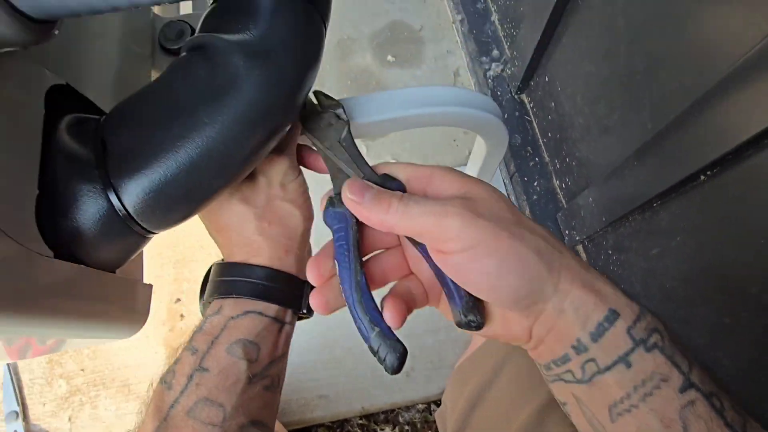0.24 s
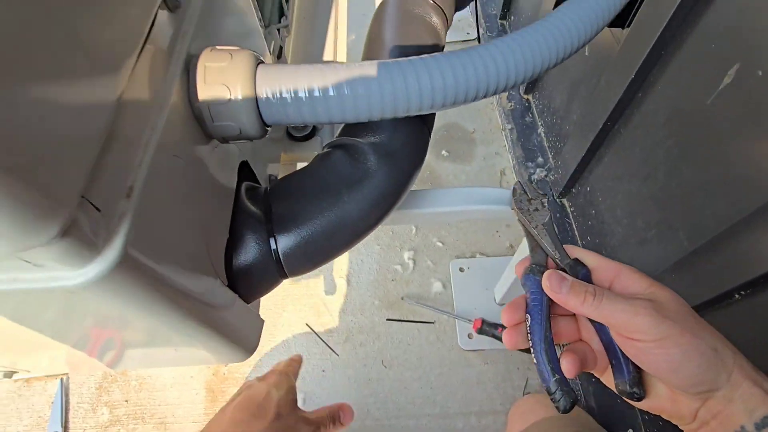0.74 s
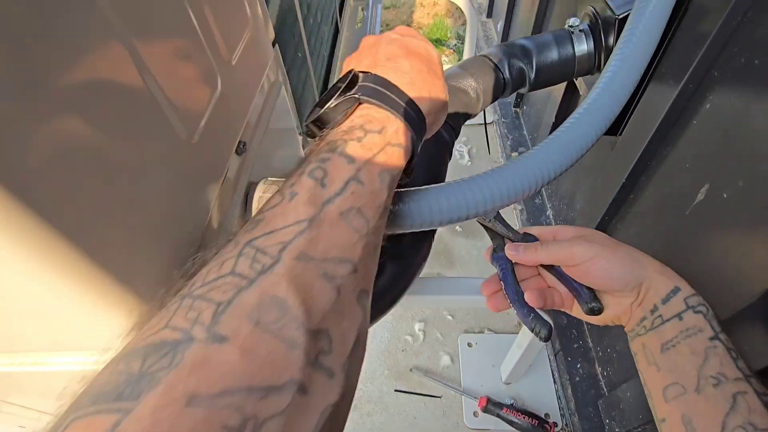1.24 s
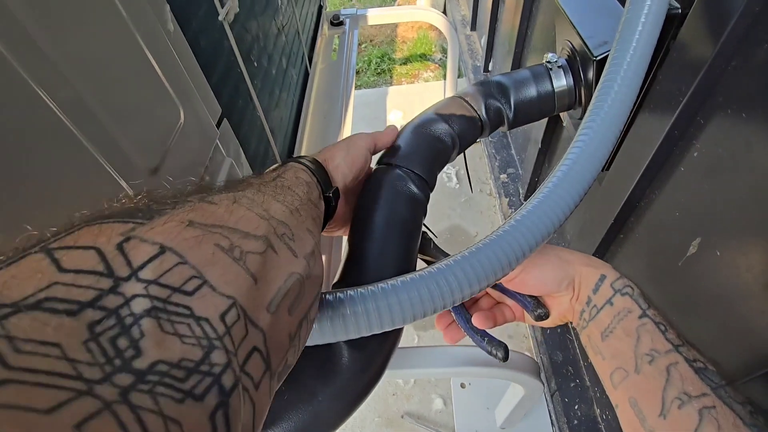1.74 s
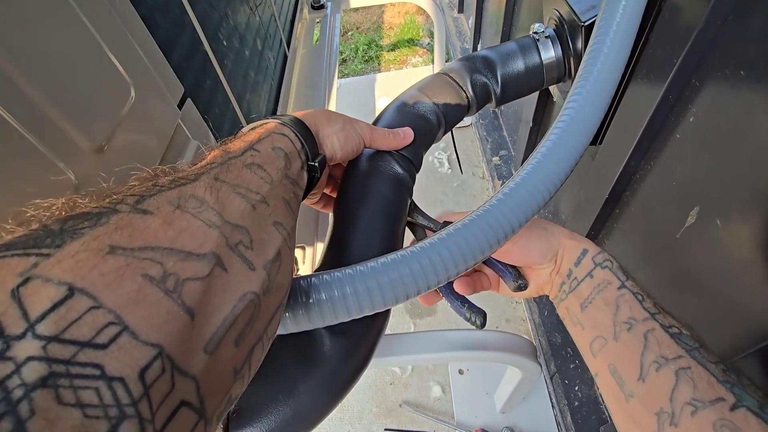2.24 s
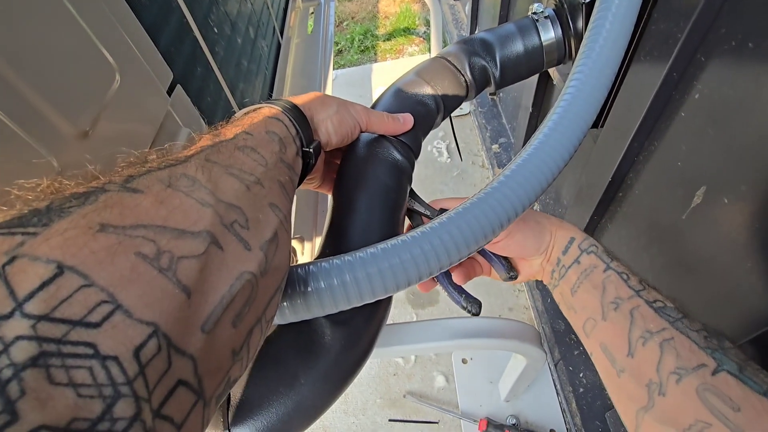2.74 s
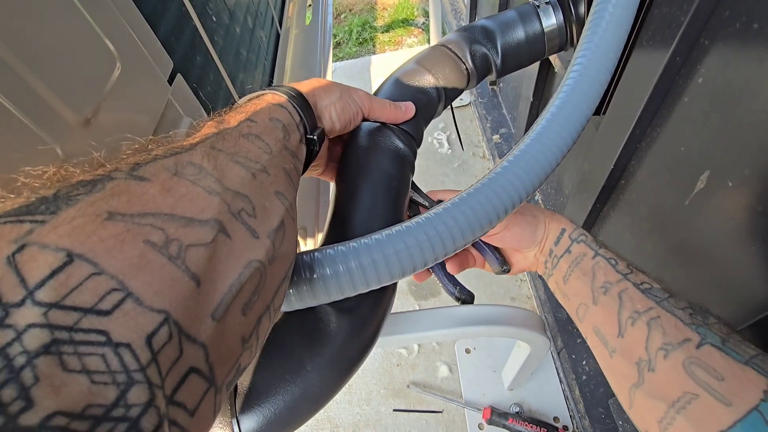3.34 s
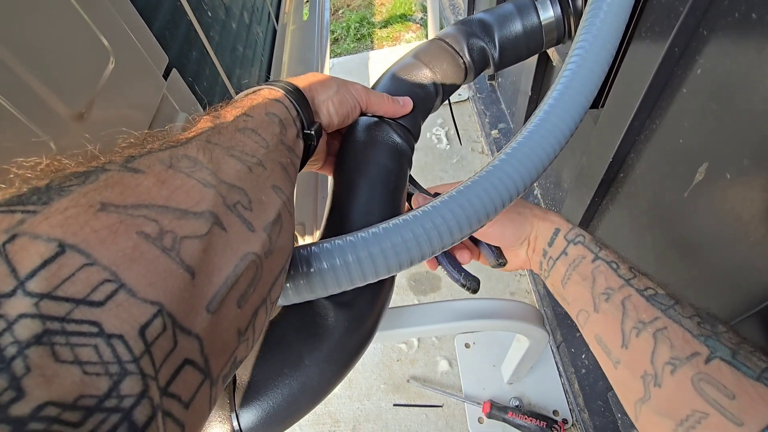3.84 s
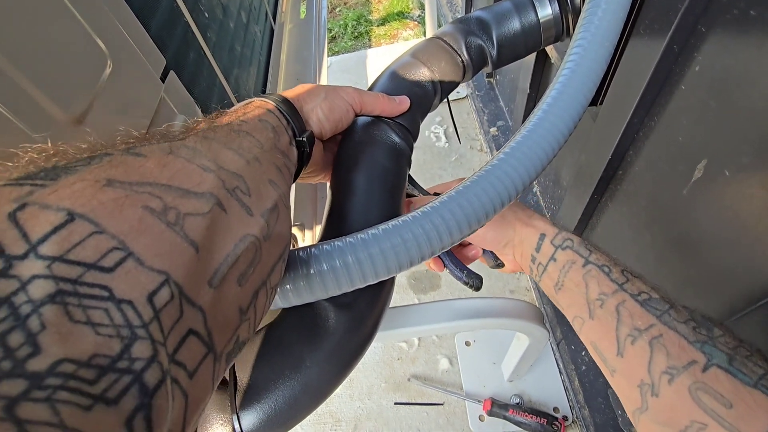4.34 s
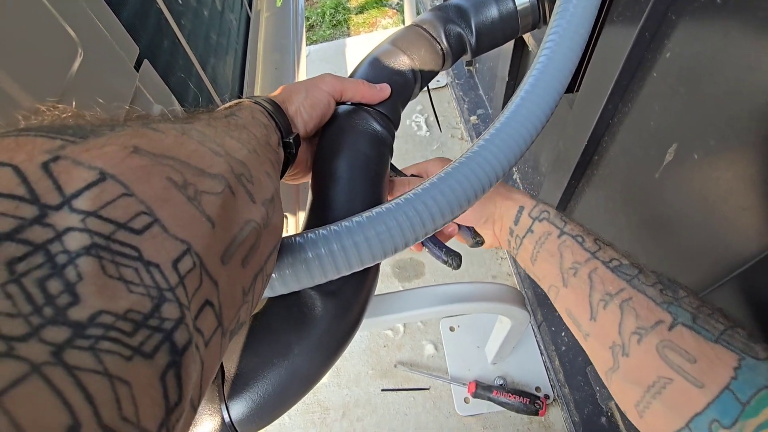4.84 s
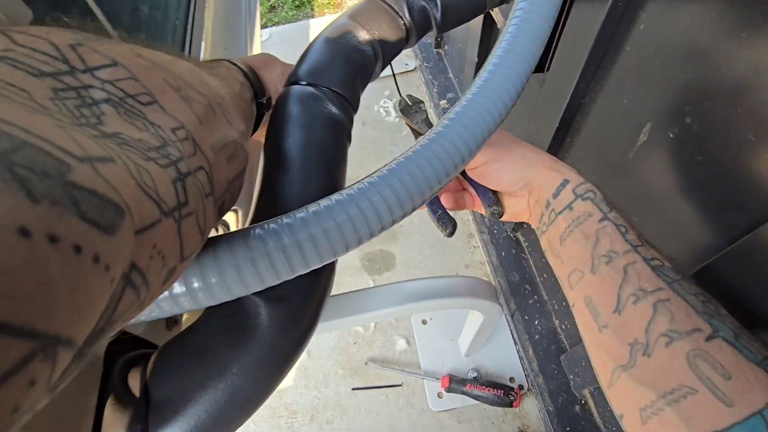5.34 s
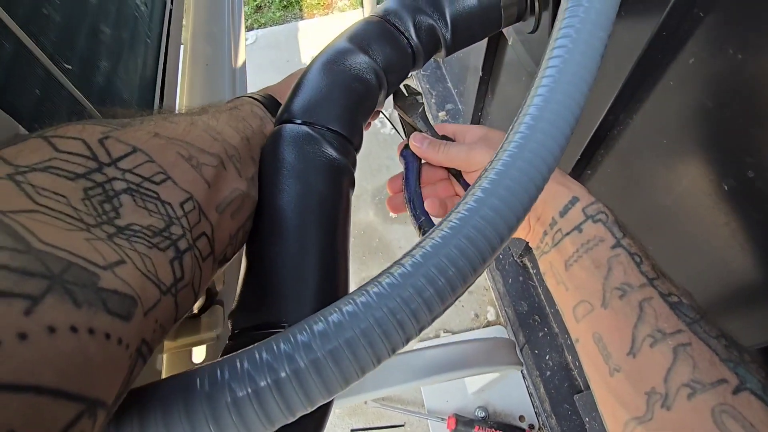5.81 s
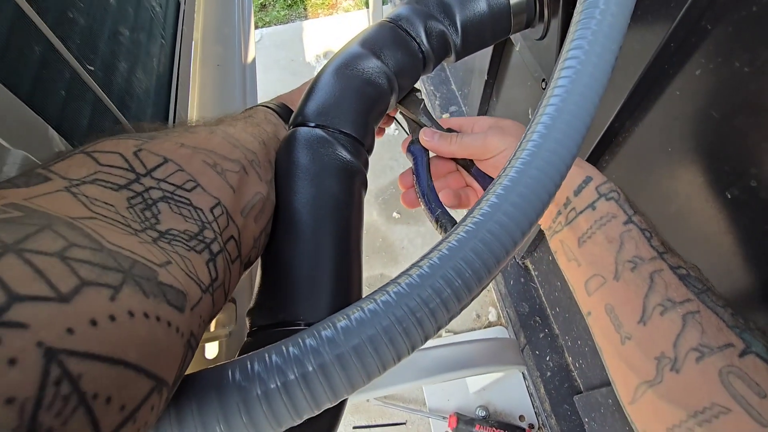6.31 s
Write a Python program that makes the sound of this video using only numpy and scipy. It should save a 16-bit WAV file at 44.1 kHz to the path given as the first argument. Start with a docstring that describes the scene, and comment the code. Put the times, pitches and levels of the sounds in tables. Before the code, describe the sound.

Cutters snip zip ties, with a few knocks on a metal cabinet and faint rubbing over a low outdoor rumble and distant birdsong.

```python
"""Diagonal cutters snip zip-tie tails on the hoses of an outdoor air conditioning unit.
Each sudden fracture rings the jaws and echoes between the metal cabinet and the wall. Offcuts tick,
the cabinet is knocked, and a bumped hose booms in its damped modes. Friction of arms on the lagging
makes a rustle and thin squeaks. Behind them lie a distant songbird, puffs of air on the two
microphones, a low rumble and the wash of the yard."""
import sys
import numpy as np
from scipy import signal
from scipy.io import wavfile
from scipy.ndimage import uniform_filter1d

SR = 44100
rng = np.random.default_rng(int(sys.argv[2]) if len(sys.argv) > 2 else 0)


def to_wav(sig):
    """Store sig (one row per channel, or 1-D mono) as 16-bit WAV at the path in sys.argv[1].

    Samples outside -1..1 are clipped; the rate is SR.
    """
    pcm = np.clip(np.atleast_2d(sig), -1, 1) * 32767
    pcm = np.round(pcm).astype(np.int16)
    wavfile.write(sys.argv[1], SR, pcm.T)  # frames by channels


N = 289737

# Impacts of the cutters, on the cabinet and of offcuts. Each row: start in seconds, relative level in dB,
# gains of the low, middle, high and top bands in dB, pan (left minus right) in dB.
CUTTER_SNIPS = [(0.1797, -42.5, -34, -42, 8.5, 5, 6), (0.1906, -18.5, -13.5, -14.5, -1.5, -1.5, 2.2),
                (0.4612, -30.5, -25, -13.5, -8.5, 1.5, 0.81), (5.1048, -18, -16, -8.5, -2.5, -6.5, 0.5)]
CABINET_KNOCKS = [(1.2812, -26, -8, -5, -1.5, -9.5, 2.75), (1.7112, -12.5, -10, -12, -8.5, -12, 1)]
OFFCUT_TICKS = [(0.573, -47, -11, -2, -5, -17.5, -4), (0.5858, -37, -3, 2, -11.5, -15, -0.5),
                (0.6235, -47, -20.5, -27, -10, 2, -2), (1.0225, -50, -21, -8, -11, 6, 0),
                (3.491, -50.5, -0.5, -5, -16, -36, 1), (3.71, -53.5, -19, -14, -6, -10, -2),
                (3.997, -48, -11, -5.5, -3, -7, 1), (4.469, -50.5, -2.5, -3, -13, -12, 2),
                (5.163, -43, -3, -2, -14, -30, 2.5), (5.3165, -43, 0, -1, -3, -28, 2),
                (5.757, -47, -4, -11.5, -19, -18, -11), (6.548, -59.5, -6.5, -9.5, -2, -23, -1)]
# Spectra of their noise bursts. Each row: frequency in Hz, gain in dB.
SNIP_SPECTRUM = [(150, -15), (330, -1), (420, -8), (560, -18.5), (800, -16), (1200, -20), (1500, -6),
                 (1750, -17.5), (2150, -5), (3000, -8), (4200, -5.5), (6000, -7.5), (8600, -10.5),
                 (10400, -17), (12400, -5), (16000, -16)]
KNOCK_SPECTRUM = [(70, -21), (125, 2.5), (200, -4.5), (350, 3), (500, -3), (700, -4.5), (800, -9),
                  (930, -24), (1350, -11), (1700, -13.5), (2000, -14), (2750, -11), (4060, -23),
                  (7200, -23), (10400, -28.5), (12800, -24.5), (16000, -29.5)]
TICK_SPECTRUM = [(150, -32), (450, 8), (950, -8), (1700, -6), (3000, -1), (6000, -2), (10000, -9),
                 (16000, -3)]
# The four bands of an impact. Each row: lower and upper edge in Hz, base crack t60 and echo t60
# (time to fall 60 dB) in seconds, relative echo level in dB, left-right correlation from 0 to 1.
IMPACT_BANDS = [(119.4, 775, 0.025, 0.35, -16.5, .55), (690, 1900, 0.024, 0.13, -15, 0.07),
                (2500, 8000, 0.02, 0.096, -18.5, .1), (8000, 18000, 0.02, 0.15, -26, 0.05)]
# Imbalance of the impacts at the microphones. Each row: frequency in Hz, pan in dB.
IMPACT_PAN = [(200, -1), (500, -2), (1200, 0.5), (2500, 1.5), (3800, -0.5), (4700, -2), (6300, -6.5),
              (8000, 0), (9000, 6), (10300, 7.5), (12000, -2.5), (14500, -5)]
# Normal modes of the struck bodies. Each row: frequency in Hz, relative level in dB, t60 in seconds.
JAW_MODES = [(1470, -7, .04), (2110, -1, .06), (2620, -1, .07), (3380, -3, .07), (3770, -1, .07),
             (4350, -3, .07), (5250, -6, .05), (6100, -4, .05), (7400, -6, .05), (8800, -7, .04),
             (12700, -8, .04)]
CABINET_MODES = [(126, 8, 0.094), (210.5, 3, 0.34), (377, -8, 0.25), (433, -3, 0.26), (590, -5, 0.12),
                 (730, -5, 0.14), (1093, -16, 0.24), (1670, -10.5, 0.054), (1700, -11.5, 0.086),
                 (2500, -12, .09), (3000, -17.5, 0.14), (4650, -18, .1), (7090, -15.5, 0.075),
                 (7560, -24.5, 0.083)]
HOSE_MODES = [(262.6, 4.5, .38), (236, 5.5, 0.12), (289.6, -2.5, 0.17), (344.5, -8.5, 0.15),
              (454, -7.5, 0.18), (557, -20.5, 0.37), (740, -16.5, 0.16), (833, -18, 0.092)]
# Bumps on the hose. Each row: start in seconds, gain in dB, factor on pitch and decay rate.
HOSE_BUMPS = [(2.928, -35.5, 1.14), (5.3179, -30.5, 1), (5.3293, -26.5, 1.05), (5.3428, -28.5, 1),
              (5.401, -34, 0.98)]

# Arm strokes on the lagging. Each row: start and length in seconds, rustle, fizz and pan in dB.
ARM_STROKES = [(0.129, 0.52, -57, -59, 0.5), (0.593, 0.8, -64, -66, 0), (1.323, 0.87, -60, -62, 1),
               (2.136, 0.95, -66, -67.5, -0.5), (3.0, 0.78, -72.5, -95, -6), (4.007, 0.993, -72.5, -79, -1),
               (5.194, 0.42, -62, -62, 2), (5.5, 0.98, -66, -69, 2.5)]
# Soft scuffs of handling, and one low buffet of air on the microphones.
# Each row: start and length in seconds, centre and bandwidth in Hz, level in dB.
SCUFFS_AND_BUFFET = [(0.83, 0.14, 2400, 600, -57), (1.37, 0.1, 11400, 8000, -53),
                     (3.315, 0.168, 3770, 1100, -59.5), (4.457, 0.07, 1430, 1490, -52),
                     (5.309, 0.057, 1400, 1100, -47.5), (5.848, 0.75, 4960, 1780, -62.5),
                     (6.221, 0.1, 47.6, 36, -43.5)]
# Arches of squeak pitch. Each row: crest, rise and fall times in seconds, crest frequency in Hz,
# limiting slope of the flanks in Hz per second, relative level in dB.
SQUEAK_ARCHES = [(1.93, 0.13, 0.16, 14600, 20000, -66), (3.04, .005, .09, 15800, 52000, -75),
                 (3.249, 0.14, 0.11, 14500, 21000, -74.5), (4.14, .07, .09, 15150, 16000, -74),
                 (4.2, 0.21, 0.11, 12950, 17000, -70), (4.32, 0.058, 0.11, 12100, 17000, -71),
                 (4.32, .07, .1, 15100, 19000, -74), (4.51, .08, .1, 11000, 8000, -75),
                 (5.93, .15, 0.076, 15600, 24000, -68), (6.0, 0.19, 0.088, 13900, 7000, -70),
                 (6.09, 0.035, 0.14, 12300, 8500, -59.5), (6.22, .01, 0.075, 11500, 17000, -75),
                 (6.22, .02, .31, 15800, 17000, -71), (6.25, .05, .24, 14100, 15000, -71)]

# Bird syllables. Each row: time in seconds, frequency in Hz, relative level in dB, roughness from 0 to 1.
BIRD_PIP = [(0, 4380, -12, 0), (.010, 4190, 0, 0.05), (.021, 4115, 0, 0), (.031, 3950, -20, 0)]
BIRD_SLUR = [(0, 5920, -15, 0.986), (.012, 6270, -6, 0.33), (.025, 6050, -6, 0.53), (.033, 5300, 1, .1),
             (.042, 4160, -5, 0)]
BIRD_RISE = [(0, 5380, -20.5, 0.47), (.017, 6470, 4, 0.64), (.035, 7400, -10, .3), (.048, 8200, -23, 0.085)]
BIRD_WHISTLE = [(0, 3920, -20, .1), (.028, 3895, -5, .08), (.05, 3860, -5, .08), (.075, 3785, 0, .03),
                (.145, 3775, -1.5, .03), (.175, 3760, -15, .03)]
# Closing calls of the song. Each row: starts of the rise and of the whistle in seconds, gain in dB.
BIRD_CALLS = [(3.527, 3.566, -53.5), (3.86, 3.88, -51.5)]
# Distant chirps. Each row: start and length in seconds, first and last pitch in Hz, relative level in dB.
FAR_CHIRPS = [(0.67, .05, 4200, 3800, -77.5), (0.72, 0.082, 2125, 2040, -64),
              (0.82, .045, 3697, 3750, -67.5), (0.885, .05, 4430, 3780, -68),
              (1.2, 0.086, 4440, 3900, -72.5)]

# Puffs of air on the microphones. Each row: start and length in seconds, peak level and pan in dB.
AIR_PUFFS = [(2.27, 0.3, -53, -26), (2.427, .42, -45.5, -29.5), (2.68, 0.5, -45.5, -28.5),
             (3.052, 0.38, -59, -23), (4.897, 0.48, -54, -15)]
# Spectra of the continuous noises. Each row: frequency in Hz, relative level in dB.
RUSTLE_SPECTRUM = [(1350, -23.5), (2300, -1.5), (2550, -2), (3150, 0), (3780, -1), (5290, -2.5),
                   (6500, -1.5), (8120, -23), (9000, -21.5), (11700, -37.5), (19800, -120)]
FIZZ_SPECTRUM = [(4410, -36), (7500, 1), (8360, -4), (10600, -5), (11700, 2), (15100, 0.5), (15700, -3.5),
                 (16200, -11.5), (16500, -44)]
GUST_SPECTRUM = [(14, -30), (28, -10), (52, 4.5), (95, 1), (165, -1.5), (260, -10), (400, -17.5),
                 (800, -28.5), (1600, -49), (4000, -62.5)]
RUMBLE_SPECTRUM = [(14, -37), (22, -32.5), (30, -21.5), (38, -3.5), (50, 3.5), (65, 2), (91, 2.5),
                   (135, -1.5), (203, 2), (262, -3), (300, -14), (420, -23), (550, -49.5), (900, -100)]
YARD_SPECTRUM = [(190, -34), (330, -3), (405, -12.5), (472, -8), (590, -8), (710, -5), (850, -11),
                 (957, -17), (1320, -10), (1470, -13), (1650, -13.5), (2800, -28), (3640, -50.5),
                 (6160, -120)]
# Slow drift of the rumble's upper part and of the yard. Each row: time in seconds, gain in dB.
DRONE_DRIFT = [(0, -44), (1.6, -43.5), (3.75, -43), (4.6, -48.5), (6.57, -50.5)]
YARD_DRIFT = [(0, -53), (1.0, -55.5), (1.6, -49), (2.2, -52.5), (3.4, -53.5), (4.25, -59.5), (5.0, -62.5),
              (6.1, -57.5), (6.57, -62.5)]
# Likeness of the noises at the two microphones. Each row: frequency in Hz, correlation from -1 to 1.
NOISE_CORRELATION = [(60, .68), (130, .8), (290, .85), (640, .25), (1400, -.1), (3100, 0), (15000, -.1)]
# Imbalance of the noises at the microphones. Each row: frequency in Hz, pan in dB.
NOISE_PAN = [(60, -0.5), (110, 0), (200, -2.5), (380, -1.5), (700, -0.5), (1290, 3), (2380, -0.5),
             (4400, -4.5), (8120, -0.5), (15000, -6)]


def snips():
    """Fracture: a tie parts in a burst of noise that excites the modes of the jaws."""
    return impacts(CUTTER_SNIPS, SNIP_SPECTRUM, JAW_MODES,
                   level_db=-2.3, crack_scale=0.71, echo_db=-2, ring_db=-21.5)


def knocks():
    """Impulse response: the knocked metal cabinet rings in its normal modes."""
    return impacts(CABINET_KNOCKS, KNOCK_SPECTRUM, CABINET_MODES,
                   level_db=0, crack_scale=0.85, echo_db=5.5, ring_db=-5)


def ticks():
    """Light impact: offcuts click and only weakly excite the cabinet's modes."""
    return impacts(OFFCUT_TICKS, TICK_SPECTRUM, CABINET_MODES,
                   level_db=-3, crack_scale=0.61, echo_db=-5, ring_db=-25)


def impacts(rows, spectrum, modes, level_db, crack_scale, echo_db, ring_db, rise_s=0.0003):
    """Exponential decay: each crack, its ringing and its dense echoes die away band by band."""
    t = np.arange(SR // 2) / SR
    ringing = gain_of(ring_db) * unit_rms(ring(modes, t))
    attack = 1 - np.exp(-t / rise_s)
    out = np.zeros((2, N))
    for start_s, db, *bands_db, pan_db in rows:
        for band_db, band in zip(bands_db, IMPACT_BANDS):
            low_hz, high_hz, crack_t60, echo_t60, band_echo_db, correlation = band
            crack = noise_pair(len(t), correlation) * gain_of(-60 * t / (crack_t60 * crack_scale))
            echoes = noise_pair(len(t), correlation) * gain_of(echo_db + band_echo_db - 60 * t / echo_t60)
            burst = unit_rms(coloured(crack + echoes, spectrum))
            bandpass = signal.butter(3, [low_hz, high_hz], "band", fs=SR, output="sos")
            sound = signal.sosfilt(bandpass, (burst + ringing) * attack)
            sound /= np.std(sound[:, :SR // 50])  # the first 20 ms set the level
            add(out, start_s, gain_of(db + level_db + band_db) * panned(pan_db) * sound)
    return out


def at_microphones(sound):
    """Level difference: each microphone hears the impacts with its own spectral colour."""
    left = coloured(sound[:1], [(hz, db / 2) for hz, db in IMPACT_PAN])
    right = coloured(sound[1:], [(hz, -db / 2) for hz, db in IMPACT_PAN])
    return np.vstack([left, right])


def hose(rise_s=0.0021):
    """Resonance: the hollow hose booms in its low modes after each soft bump."""
    t = np.arange(SR) / SR
    attack = 1 - np.exp(-t / rise_s)
    out = np.zeros((2, N))
    for start_s, db, pitch in HOSE_BUMPS:
        add(out, start_s, gain_of(db) * panned(-1.5) * ring(HOSE_MODES, pitch * t) * attack)
    return out


def scuffs_and_buffet():
    """Band-limited noise: soft scuffs of handling, and one low buffet of air on the microphones."""
    out = np.zeros((2, N))
    for start_s, length_s, hz, width_hz, db in SCUFFS_AND_BUFFET:
        n = round(length_s * SR)
        bandpass = signal.butter(2, [hz - width_hz / 2, hz + width_hz / 2], "band", fs=SR, output="sos")
        noise = unit_rms(signal.sosfilt(bandpass, rng.standard_normal((2, n))))
        add(out, start_s, gain_of(db) * noise * signal.windows.tukey(n, 0.7))
    return out


def rubbing(t, attack_s=0.08, release_s=0.15, sag_db=-2):
    """Sliding friction: rustle and fizz follow an arm's speed as it starts, slows and lets go."""
    rustle = noise_bed(RUSTLE_SPECTRUM, patchy_db=2.4, flicker_db=1.2, size=512)
    fizz = noise_bed(FIZZ_SPECTRUM, patchy_db=3.5, flicker_db=0.6, size=512)
    out = np.zeros((2, N))
    for start_s, length_s, rustle_db, fizz_db, pan_db in ARM_STROKES:
        age = t - start_s
        speed = np.clip(np.minimum(age / attack_s, (length_s - age) / release_s), 0, 1)
        speed *= gain_of(sag_db * np.clip(age / length_s, 0, 1))
        out += speed * panned(pan_db) * (gain_of(rustle_db) * rustle + gain_of(fizz_db) * fizz)
    return out


def squeaks(level_db=-6.5, crest_rounding_s=0.038):
    """Friction tones: two wavering strands rise and fall in pitch with the speed of rubbing."""
    out = np.zeros((2, N))
    for crest_s, rise_s, fall_s, crest_hz, hz_per_s, db in SQUEAK_ARCHES:
        t = np.arange(-rise_s, fall_s, 1 / SR)
        arch_hz = crest_hz - hz_per_s * (np.hypot(t, crest_rounding_s) - crest_rounding_s)
        for ratio, waver, strand_db in [(1, 0.008, 0), (1.06, 0.016, -9)]:
            hz = arch_hz * (ratio + waver * wander(len(t), size=800))
            flutter_db = 3.5 * wander(len(t), size=500)
            strand = glide(hz, db + level_db + strand_db + flutter_db, jitter=0.0029)
            add(out, crest_s - rise_s, strand * panned(-12))
    return out


def bird(trill_s=2.514, step_s=0.1145, slur_delay_s=0.04):
    """Frequency-modulated song: one pip and slur, an even trill of seven more, then two calls."""
    song = np.zeros((2, N))
    trill = [(trill_s + k * step_s, -52) for k in range(7)]
    for start_s, db in [(2.025, -56)] + trill:
        add(song, start_s, gain_of(db) * syllable(BIRD_PIP))
        add(song, start_s + slur_delay_s, gain_of(db - 1) * panned(-8) * syllable(BIRD_SLUR))
    for rise_s, whistle_s, db in BIRD_CALLS:
        add(song, rise_s, gain_of(db - 8.5) * panned(-7) * syllable(BIRD_RISE))
        add(song, whistle_s, gain_of(db) * syllable(BIRD_WHISTLE))
    return scattered(song, near_db=-4, near_t60=0.12, far_db=-15, far_t60=1.9)


def syllable(shape, buzz=0.086, waver=0.0025, flutter_db=0.6):
    """Random modulation: slow changes make a note waver, and fast ones make it buzz."""
    hz, db, roughness = follow(shape, np.arange(0, shape[-1][0], 1 / SR))
    hz *= 1 + waver * wander(len(hz), size=500)
    db += flutter_db * wander(len(hz), size=300)
    return glide(hz, db, jitter=buzz * roughness) * panned(0.29)


def far_chirps(level_db=-3):
    """Reverberant field: short, distant slides of pitch arrive mostly as scattered sound."""
    out = np.zeros((2, N))
    for start_s, length_s, first_hz, last_hz, db in FAR_CHIRPS:
        hz = np.linspace(first_hz, last_hz, round(length_s * SR))
        add(out, start_s, glide(hz, db + level_db, jitter=0.013) * panned(0.5))
    return scattered(out, near_db=7, near_t60=0.12, far_db=-12.5, far_t60=1.5)


def scattered(song, near_db, near_t60, far_db, far_t60):
    """Scattering: near walls add a short tail to birdsong, and far trees a long one."""
    t = np.arange(SR) / SR
    tails = sum(gain_of(db) * unit_rms(rng.standard_normal((2, SR)) * gain_of(-60 * t / t60))
                for db, t60 in [(near_db, near_t60), (far_db, far_t60)])
    return song + signal.fftconvolve(song, tails / np.sqrt(SR), axes=1)[:, :N]


def gusts(t, swell_share=0.38):
    """Pressure fluctuation: each puff of air on the microphones swells, then dies away."""
    envelope = np.zeros((2, N))
    for start_s, length_s, db, pan_db in AIR_PUFFS:
        swell = np.interp((t - start_s) / length_s, [0, swell_share, 1], [0, 1, 0])
        envelope += gain_of(db) * panned(pan_db) * swell
    return envelope * noise_bed(GUST_SPECTRUM, patchy_db=3, flicker_db=1.3, size=2048)


def yard(t):
    """Ambient noise: a midrange wash and its faint hiss drift together in level."""
    drift_db, = follow(YARD_DRIFT, t)
    wash = noise_bed(YARD_SPECTRUM, patchy_db=2, flicker_db=1, size=1024)
    hiss = gain_of(-16) * noise_bed(RUSTLE_SPECTRUM, patchy_db=4, flicker_db=0.6, size=512)
    fizz = gain_of(-25) * noise_bed(FIZZ_SPECTRUM, patchy_db=5, flicker_db=3, size=512)
    return gain_of(drift_db) * (wash + hiss + fizz)


def rumble(t, crossover_hz=84, deep_db=-45):
    """Low-frequency noise: the deepest band holds steady while the drone above it slowly fades."""
    noise = panned(0.48) * noise_bed(RUMBLE_SPECTRUM, patchy_db=1, flicker_db=1.5, size=4096)
    deep = signal.sosfiltfilt(signal.butter(3, crossover_hz, fs=SR, output="sos"), noise)
    drone_db, = follow(DRONE_DRIFT, t)
    return gain_of(deep_db) * deep + gain_of(drone_db) * (noise - deep)


def noise_bed(spectrum, patchy_db, flicker_db, size):
    """Partial coherence: stereo noise with drifting spectral patches and a broadband flicker."""
    hz = np.fft.rfftfreq(size, 1 / SR)
    hop = size // 4
    frames = N // hop + 5
    left_re, left_im, other_re, other_im, patches = rng.standard_normal((5, frames, len(hz)))
    patches = uniform_filter1d(patches, size=8, axis=0)  # smooth in time
    patches = unit_rms(uniform_filter1d(patches, size=6, axis=1))  # and in frequency
    flicker = unit_rms(uniform_filter1d(rng.standard_normal((frames, 1)), size=5, axis=0))
    correlation = at_frequency(NOISE_CORRELATION, hz)
    left = left_re + 1j * left_im
    right = correlation * left + np.sqrt(1 - correlation ** 2) * (other_re + 1j * other_im)
    spectra = np.array([left, right]) * panned(at_frequency(NOISE_PAN, hz))[:, None]
    spectra *= gain_of(at_frequency(spectrum, hz) + patchy_db * patches + flicker_db * flicker)
    _, noise = signal.istft(spectra.swapaxes(1, 2), nperseg=size, noverlap=size - hop)
    return noise[:, :N] / np.std(noise[:, :N].mean(0))


def ring(modes, t):
    """Free vibration: a struck body sounds as a sum of damped sines."""
    return sum(gain_of(db - 60 * t / t60) * np.sin(2 * np.pi * hz * t) for hz, db, t60 in modes)


def glide(hz, db, jitter):
    """Phase as the integral of frequency: a sine follows a pitch curve with quick random wobble."""
    wobble = unit_rms(uniform_filter1d(rng.standard_normal(len(hz)), size=40))
    cycles = np.cumsum(hz * (1 + jitter * wobble)) / SR
    return np.sqrt(2) * gain_of(db) * np.sin(2 * np.pi * cycles) * signal.windows.tukey(len(hz), 0.15)


def coloured(x, spectrum, size=2048):
    """Minimum-phase filtering: the spectrum is shaped while attacks stay sharp."""
    hz = abs(np.fft.fftfreq(size, 1 / SR))
    log_gain = np.log(gain_of(np.maximum(at_frequency(spectrum, hz), -70)))
    taps = np.fft.ifft(np.exp(np.conj(signal.hilbert(log_gain)))).real
    return signal.fftconvolve(x, taps[None], axes=1)[:, :x.shape[1]]


def noise_pair(n, correlation):
    """Correlation: two white noises share a part of their power."""
    shared = np.sqrt(correlation) * rng.standard_normal(n)
    return shared + np.sqrt(1 - correlation) * rng.standard_normal((2, n))


def wander(n, size):
    """Low-pass noise of rms 1 that changes within about size samples."""
    return unit_rms(uniform_filter1d(uniform_filter1d(rng.standard_normal(n), size), size))


def at_frequency(points, hz):
    """Interpolation of a table on a log-frequency axis."""
    table_hz, values = np.transpose(points)
    return np.interp(np.log(hz + 1), np.log(table_hz + 1), values)


def follow(rows, t):
    """Linear interpolation of a table's columns at times t."""
    times, *columns = np.transpose(rows)
    return [np.interp(t, times, column) for column in columns]


def gain_of(db):
    """Amplitude ratio of a level in decibels."""
    return 10 ** (np.asarray(db) / 20)


def unit_rms(x):
    """Normalisation to rms 1."""
    return x / np.sqrt(np.mean(x ** 2) + 1e-20)


def panned(db):
    """Left and right gains for a level difference."""
    return gain_of(np.array([[0.5], [-0.5]]) * db)


def add(mix, start_s, sound):
    """Superposition of a stereo sound on the mix."""
    part = mix[:, max(round(start_s * SR), 0):][:, :sound.shape[1]]
    part += sound[:, :part.shape[1]]


def scene():
    """Superposition: the work on the hoses adds to the sounds of the yard."""
    t = np.arange(N) / SR
    foreground = at_microphones(snips() + knocks() + ticks()) + hose() + scuffs_and_buffet()
    background = gusts(t) + yard(t) + rumble(t)
    return foreground + background + rubbing(t) + bird() + far_chirps() + squeaks()


def record(dry, cutoff_hz=16200):
    """Clipping and band limiting: peaks are capped at full scale, then low-pass filtered."""
    taps = signal.firwin(255, cutoff_hz, window=("kaiser", 8), fs=SR)
    return signal.oaconvolve(np.clip(dry, -1, 1), taps[None], "same")


dry = scene()
out = record(dry)
to_wav(out)
```